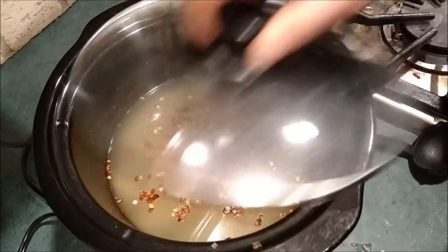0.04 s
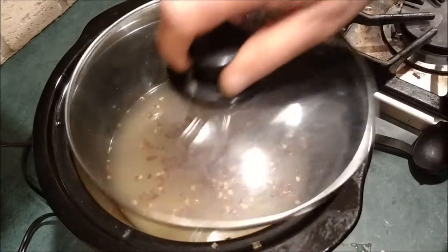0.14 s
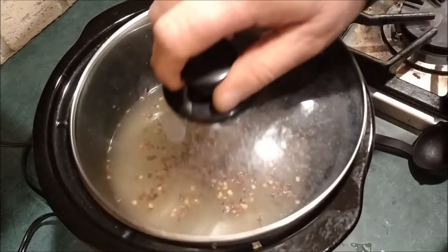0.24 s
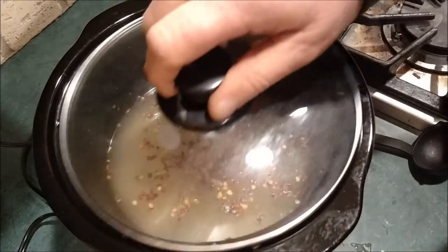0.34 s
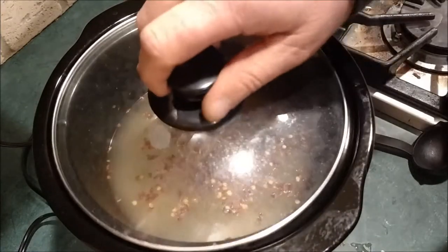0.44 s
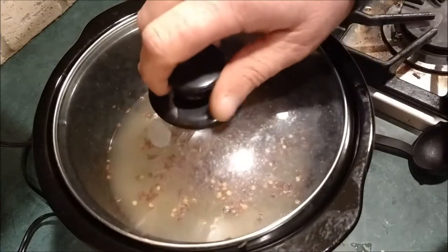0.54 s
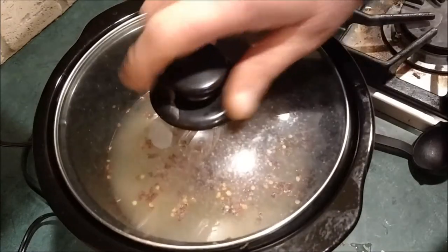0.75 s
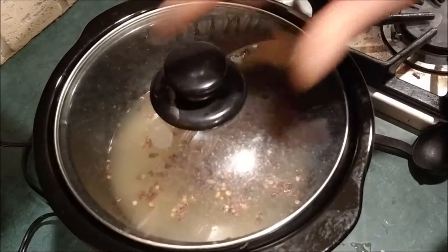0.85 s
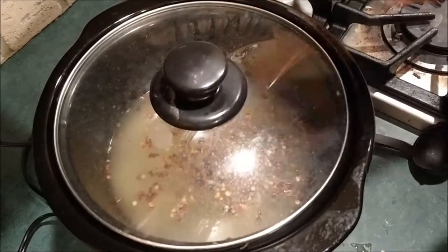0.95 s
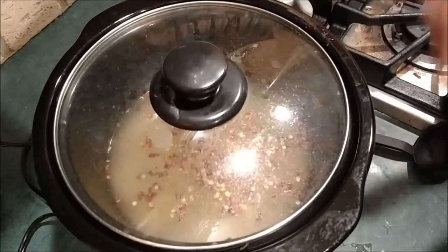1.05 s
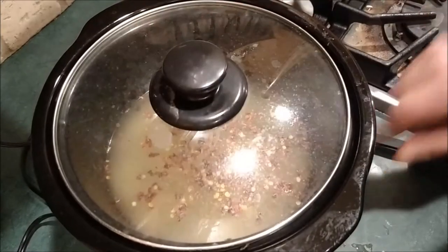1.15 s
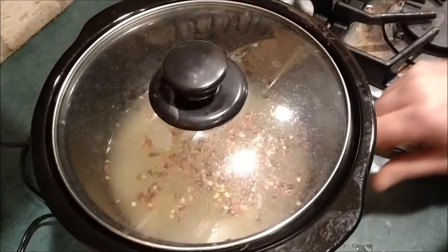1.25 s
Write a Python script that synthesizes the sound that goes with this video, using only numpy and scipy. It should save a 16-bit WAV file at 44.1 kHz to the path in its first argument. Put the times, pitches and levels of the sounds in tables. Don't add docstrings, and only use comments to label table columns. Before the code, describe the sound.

A glass lid lands on a heavy stoneware slow cooker with a sharp knock, rattles rapidly, slides and clacks into its seat with a brief ring, close to the microphone in a quiet, humming kitchen.

```python
import sys
import numpy as np
from scipy import signal
from scipy.fft import rfft, irfft, next_fast_len
from scipy.io import wavfile
from scipy.ndimage import map_coordinates

SR = 44100
rng = np.random.default_rng(int(sys.argv[2]) if len(sys.argv) > 2 else 0)


def convert_level_to_amplitude(level_db):
    exponent = np.asarray(level_db, float) / 20
    return 10 ** exponent


def generate_wav(sig):
    pcm = np.round(np.clip(np.atleast_2d(sig).T, -1, 1) * 32767).astype(np.int16)
    wavfile.write(sys.argv[1], SR, pcm)


N = 57330

# start_s, glass_level_db, crack_level_db, knock_level_db, knock_pitch_hz
ROCKING_CONTACTS = [(.2333, -23.5, -12, -8.5, 603), (.2340, -71, -23.5, -15, 1504),
                    (.2552, -23, -25.5, -7, 588), (.2652, -41, -22.5, -15, 606),
                    (.2735, -15.5, -24, -15.5, 690), (.2796, -20, -27, -11.5, 619),
                    (.2835, -16.5, -25.5, -32, 610), (.2945, -16.5, -34, -17.5, 670),
                    (.3120, -27, -33, -31, 870), (.3425, -26, -21, -21, 916),
                    (.3625, -38.5, -21.5, -25, 426), (.3745, -23, -23, -25.5, 617),
                    (.3790, -18.5, -23, -31, 587), (.3890, -28.5, -27.5, -21.5, 453),
                    (.3950, -27.5, -29.5, -23.5, 777), (.4015, -29.5, -44, -25, 606)]
SEATING_CONTACTS = [(.4462, -27.5, -23.5, -17.5, 613), (.4535, -37, -31, -18.5, 346),
                    (.4610, -29.5, -28, -19, 934), (.4700, -35, -29, -25.5, 334),
                    (.4930, -51, -44, -22, 602), (.5078, -29, -21, -14, 924), (.5120, -42, -39, -26.5, 640),
                    (.5170, -32.5, -57.5, -19.5, 369), (.5480, -55, -64.5, -22.5, 354),
                    (.5575, -66, -50, -31.5, 470), (.5785, -45, -41, -41, 2900),
                    (.5958, -27, -25, -31.5, 1000), (.6018, -46, -17, -20, 728),
                    (.6065, -30, -15.5, -14.5, 946), (.6098, -22.5, -23.5, -7.5, 1422),
                    (.6125, -52, -16.5, -37, 1226), (.6175, -44, -23, -15.5, 954),
                    (.6280, -47, -39, -33, 830), (.6930, -83, -67, -37, 1390),
                    (.7250, -102, -69, -47, 1540), (.7500, -84, -60, -43.5, 1630),
                    (.7700, -90, -72, -50, 1540), (.7900, -90, -60, -47, 1000),
                    (.8620, -95, -61, -54, 2110), (.8740, -90, -62, -57, 2950)]
TILTED_PITCHES = [1362, 1780, 2185, 2430, 2800, 3400, 3585, 4300, 5005, 5150, 5950, 6670, 7575, 8570]
SEATED_PITCHES = [1330, 1540, 1820, 2095, 2320, 2835, 3525, 3607, 4460, 5040, 5900, 6695, 7525, 8520]
# level_db, t60_s
TILTED_MODES = [(-2, 0.075), (-13.5, 0.076), (-11, 0.078), (-25, 0.3), (-21.5, 0.057), (-12.5, .06),
                (-3.5, 0.044), (-16.5, 0.061), (-11.5, 0.082), (-21, 0.055), (-27, .07), (-33.5, .08),
                (-31, 0.062), (-36.5, 0.081)]
SEATED_MODES = [(-5.5, 0.1), (-16.5, 0.24), (-20, 0.07), (-17, 0.17), (-15, 0.19), (-11, 0.098), (-9, 0.11),
                (-14, .2), (-16.5, 0.15), (-8.5, 0.047), (-42, 0.049), (-40, 0.18), (-22.5, 0.063),
                (-23, 0.055)]
# pitch_hz, level_db
WEAK_MODES = [(700, -8.5), (1500, -5.5), (3000, -18), (6000, -25.5), (9000, -40.5), (15000, -52)]
# freq_hz, density_db
CRACK_COLOUR = [(60, -36.5), (150, 0.5), (530, -0.5), (1500, -3.5), (3500, -13), (6000, -19), (8000, -37),
                (15500, -52.5)]
# start_s, level_db
POT_THUMPS = [
    (0.235, -12),
    (0.261, -17.5),
    (0.343, -23),
    (.370, -21),
    (.448, -14),
    (0.509, -14.5),
    (0.546, -14.5),
    (0.599, -21.5),
]
# pitch_hz, level_db, t60_s
THUMP_MODES = [(131, 0, .075), (215, -10, .05), (90, -15, .04)]
# start_s, level_db, pitch_hz, t60_s
POT_NOTES = [
    (.345, -24, 427, 0.27),
    (.375, -17, 444.4, 0.19),
    (.603, -14, 135.7, .11),
    (.610, -20, 132.9, 0.082),
]
# start_s, pitch_hz, level_db
WHINE_GLIDE = [
    (.78, 1353, -68),
    (.9, 1254, -65.5),
    (1.051, 1199, -67),
    (1.2, 1159, -77),
]
# freq_hz, density_db
HUM_COLOUR = [(15, -8.5), (30, 4.5), (223, 0.5), (695, -10.5), (1250, -12.5), (2690, -18.5), (7000, -29.5),
              (16000, -36.5)]
# freq_hz, t60_s
KITCHEN_DECAY = [(100, 0.55), (700, 0.4), (2000, .4), (6000, .3), (14000, 0.051)]

TOUCH_S = 0.00021
WAVER_RAD, WAVER_PER_S, FLUTTER_DB = 0.91, 60, 3
MODE_SCATTER_DB = 2.5
WEAK_T60_S, WEAK_DB = 0.041, -4.5
CRACK_T60_S, BUZZ_T60_S, BUZZ_DB = 0.014, 0.086, -13
KNOCK_T60_S, KNOCK_CYCLES = 0.02, 14
THUMP_RISE_S, NOTE_RISE_S = 0.0062, 0.00077
SWISH_S, SWISH_LONG_S, SWISH_HZ, SWISH_DB = 0.056, 0.061, 790, -63.5
WHINE_WAVER_HZ, WHINE_FLUTTER_DB = 14, 4.0
HUM_DB = -57.5
ROOM_DB, THUMP_ROOM_DB, ROOM_DELAY_S = -19.5, -17, 0.006
MIC_LOW_HZ, TOP_HZ, CEILING = 59.7, 16150, 1.2


def lid(contacts, glass):
    out, cracks = np.zeros(N + SR), np.zeros(N + SR)
    t = np.arange(SR // 4) / SR
    short = SR // 10
    rise = (1 - np.exp(-t / TOUCH_S)) ** 2
    crowd_hz = np.geomspace(WEAK_MODES[0][0], WEAK_MODES[-1][0], num=36)
    crowd_hz = crowd_hz * (1 + 0.03 * rng.standard_normal(36))
    crowd = np.column_stack([crowd_hz, along(WEAK_MODES, crowd_hz), np.full(36, WEAK_T60_S)])
    crack_decay = convert_level_to_amplitude(-60 * t / CRACK_T60_S) + convert_level_to_amplitude(BUZZ_DB - 60 * t / BUZZ_T60_S)
    for s, ring_db, crack_db, knock_db, hz in contacts:
        burst = rng.standard_normal(len(t)) * crack_decay
        knock = -np.sin(2 * np.pi * hz * t) * convert_level_to_amplitude(-60 * t / (KNOCK_T60_S + KNOCK_CYCLES / hz))
        clatter = convert_level_to_amplitude(crack_db + WEAK_DB) * ringing(crowd, t[:short], 2 * MODE_SCATTER_DB)
        ring = ringing(glass, t, MODE_SCATTER_DB)
        add(out, s, rise * (convert_level_to_amplitude(ring_db) * ring + convert_level_to_amplitude(knock_db) * knock))
        add(out, s, rise[:short] * clatter)
        add(cracks, s, convert_level_to_amplitude(crack_db) * burst)
    return out[:N] + signal.fftconvolve(cracks, causal(CRACK_COLOUR))[:N]


def pot():
    out, t = np.zeros(N + SR), np.arange(SR // 3) / SR
    for s, db in POT_THUMPS:
        thump = ringing(THUMP_MODES, t, scatter_db=1)
        add(out, s, convert_level_to_amplitude(db) * thump * (1 - np.exp(-t / THUMP_RISE_S)))
    for s, db, hz, t60 in POT_NOTES:
        note = convert_level_to_amplitude(db - 60 * t / t60) * np.sin(2 * np.pi * hz * t)
        add(out, s, note * (1 - np.exp(-t / NOTE_RISE_S)))
    return out[:N]


def swish():
    t = np.arange(N) / SR
    band = [(SWISH_HZ / 2, -30), (SWISH_HZ, 0), (SWISH_HZ * 4.5, -30)]
    return convert_level_to_amplitude(SWISH_DB) * coloured(band, N) * np.exp(-((t - SWISH_S) / SWISH_LONG_S) ** 2)


def whine():
    t = np.arange(N) / SR
    s, hz, db = np.transpose(WHINE_GLIDE)
    flutter = map_coordinates(rng.standard_normal(60), [t * 30])
    level = convert_level_to_amplitude(np.interp(t, s, db, -140, -140) + WHINE_FLUTTER_DB * flutter)
    pitch_hz = np.interp(t, s, hz) + WHINE_WAVER_HZ * np.roll(flutter, N // 3)
    return level * np.sin(2 * np.pi * np.cumsum(pitch_hz) / SR)


def hum():
    return convert_level_to_amplitude(HUM_DB) * coloured(HUM_COLOUR, N)


def kitchen(x):
    hz, t, z = signal.stft(rng.standard_normal(SR // 2), SR, nperseg=256)
    decay = convert_level_to_amplitude(-60 * t / along(KITCHEN_DECAY, hz)[:, None])
    tail = signal.istft(z * decay, SR, nperseg=256)[1]
    delayed = np.pad(x, (round(ROOM_DELAY_S * SR), 0))
    return signal.fftconvolve(delayed, tail / np.linalg.norm(tail))[:N]


def ringing(modes, t, scatter_db):
    hz, db, t60 = np.transpose(modes)[:, :, None]
    chance = rng.standard_normal((2, len(modes), 1))
    knots = np.cumsum(rng.standard_normal((len(modes), 64)), axis=1)
    walks = [np.interp(t * WAVER_PER_S, np.arange(64), k - k[0]) for k in knots]
    wander = WAVER_RAD * np.array(walks)
    flutter_db = FLUTTER_DB * np.sin(2 * wander)
    level = convert_level_to_amplitude(db + scatter_db * chance[0] + flutter_db - 60 * t / t60)
    detuned_hz = hz * (1 + 0.0046 * chance[1])
    return np.sum(level * np.sin(2 * np.pi * detuned_hz * t + wander), axis=0)


def add(track, s, sound):
    track[round(s * SR):][:len(sound)] += sound


def unit(x):
    return x / np.sqrt(np.mean(x ** 2) + 1e-20)


def along(points, hz):
    f, v = np.transpose(points)
    return np.interp(np.log(hz + 1), np.log(f + 1), v)


def coloured(spectrum, size):
    gain = convert_level_to_amplitude(along(spectrum, np.fft.rfftfreq(size, 1 / SR)))
    return unit(irfft(rfft(rng.standard_normal(size)) * gain, size))


def causal(spectrum, size=1024):
    gain = convert_level_to_amplitude(along(spectrum, np.fft.rfftfreq(size, 1 / SR)))
    cep = irfft(np.log(gain + 1e-6), size)
    cep[1:size // 2] *= 2
    cep[size // 2 + 1:] = 0
    return unit(irfft(np.exp(rfft(cep)), size)) / np.sqrt(size)


def scene():
    rocking = lid(ROCKING_CONTACTS, np.column_stack([TILTED_PITCHES, TILTED_MODES]))
    seating = lid(SEATING_CONTACTS, np.column_stack([SEATED_PITCHES, SEATED_MODES]))
    parts = [(rocking, ROOM_DB), (seating, ROOM_DB), (pot(), THUMP_ROOM_DB)]
    cooker = sum(p + convert_level_to_amplitude(room_db) * kitchen(p) for p, room_db in parts)
    return (cooker + swish() + whine() + hum())[None]


def low_pass(x):
    return signal.sosfilt(signal.butter(12, 16180, fs=SR, output="sos"), x)


def record(dry):
    m = next_fast_len(N + 4096)
    hz = np.fft.rfftfreq(m, 1 / SR)
    mic = (1j * hz / (MIC_LOW_HZ + 1j * hz)) ** 2 * (hz < TOP_HZ)
    x = irfft(rfft(dry, m) * mic, m)[:, :N]
    softened = x / (1 + np.abs(x / CEILING) ** 3) ** (1 / 3)
    return low_pass(softened)


dry = scene()
out = record(dry)
generate_wav(out)
```